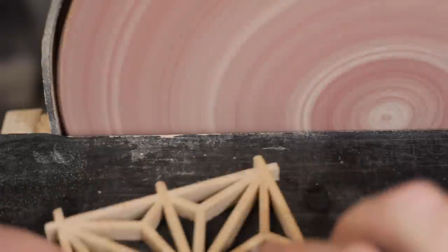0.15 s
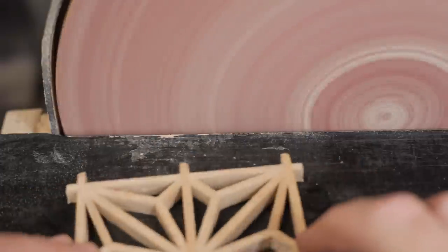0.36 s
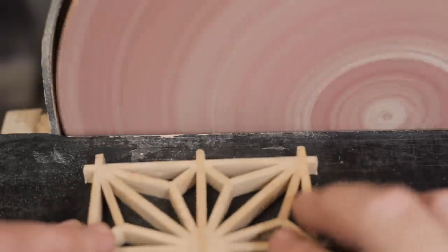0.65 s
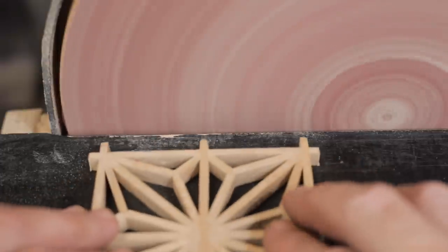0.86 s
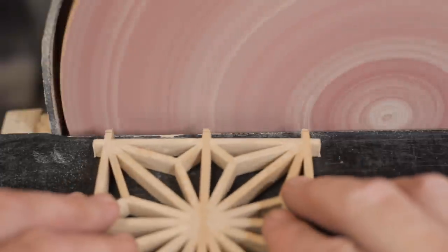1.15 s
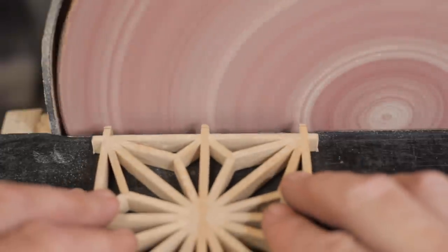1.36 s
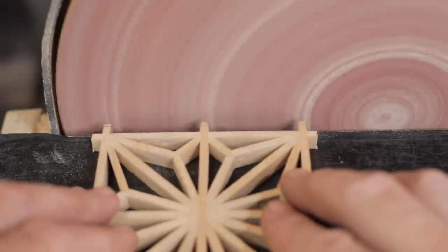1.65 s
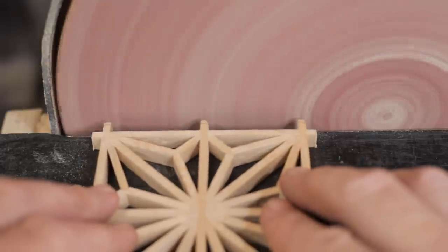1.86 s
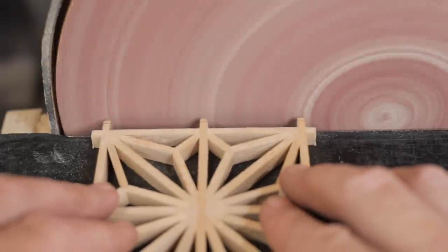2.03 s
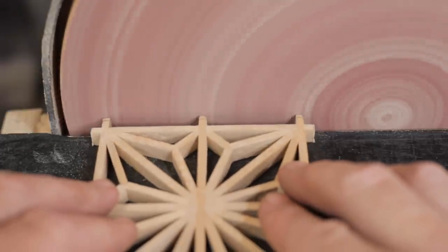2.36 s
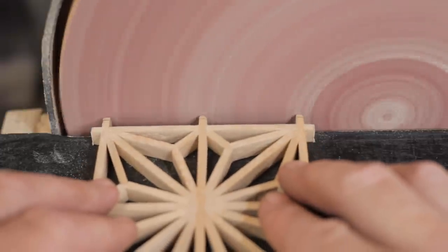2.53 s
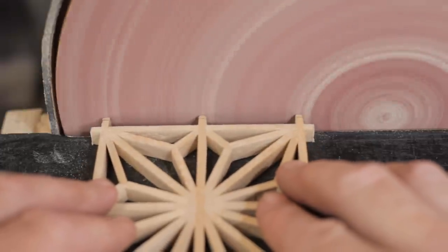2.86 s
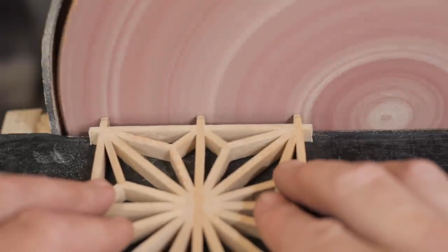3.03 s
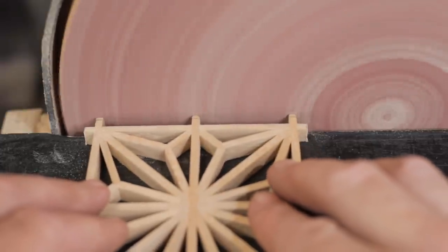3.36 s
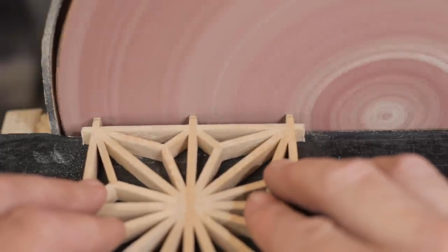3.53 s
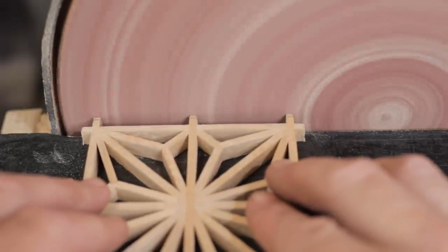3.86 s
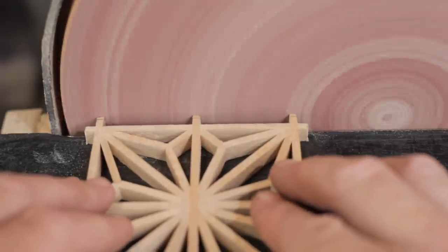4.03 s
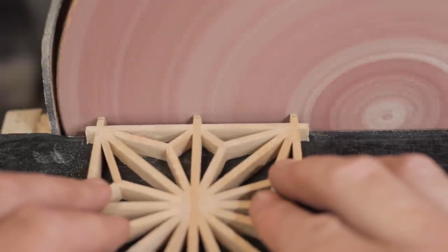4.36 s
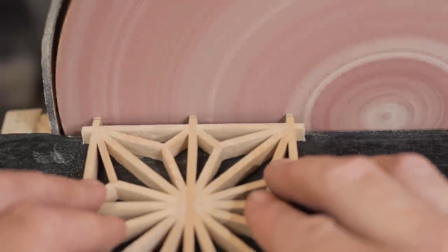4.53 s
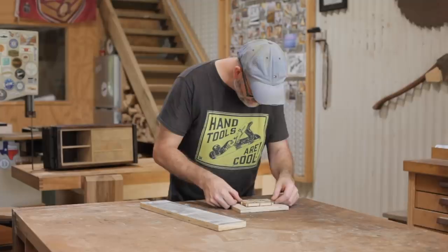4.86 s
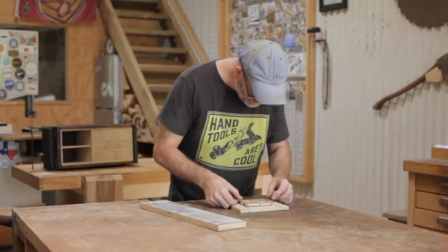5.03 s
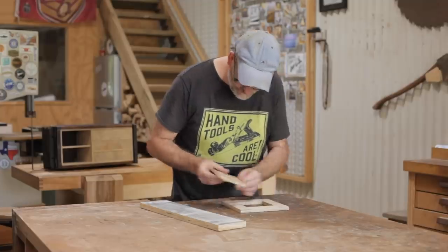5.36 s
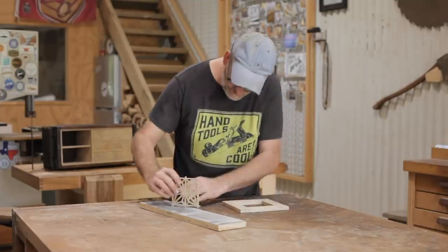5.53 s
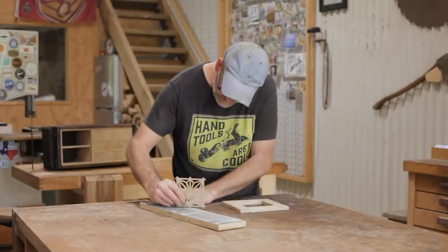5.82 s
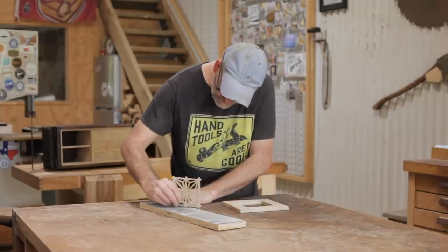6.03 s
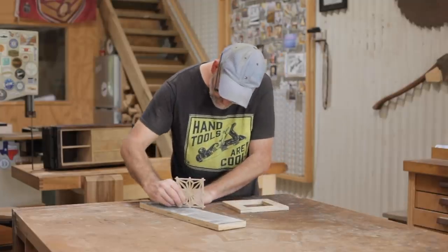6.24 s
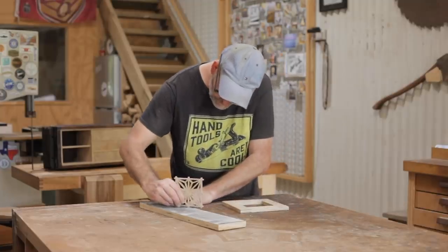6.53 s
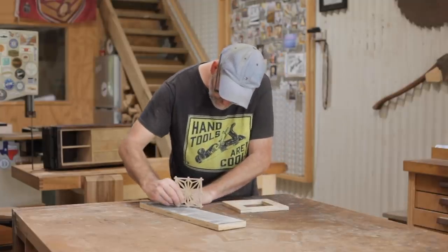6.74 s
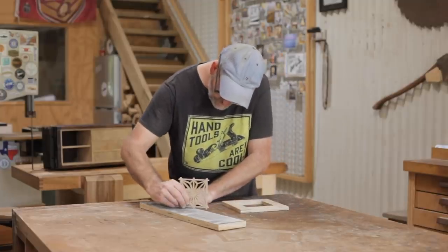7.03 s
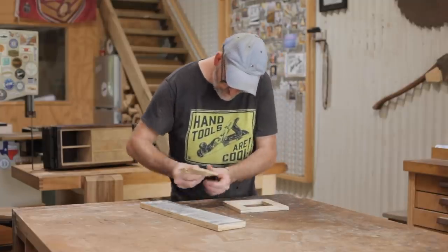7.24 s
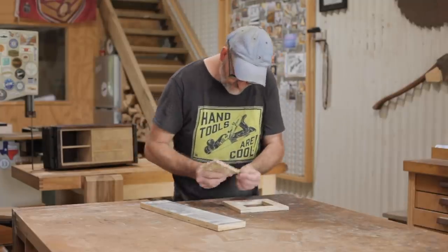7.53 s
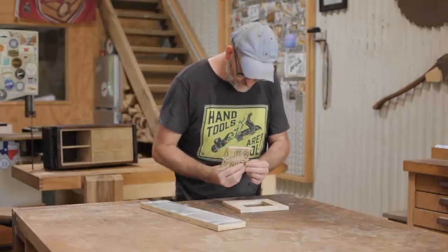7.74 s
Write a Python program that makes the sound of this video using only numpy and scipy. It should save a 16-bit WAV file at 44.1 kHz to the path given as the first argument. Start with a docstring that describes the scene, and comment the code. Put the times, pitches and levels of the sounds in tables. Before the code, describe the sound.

Thin wood rasps and flutters against a humming disc sander, followed by light wooden taps and soft, rapid rubbing on sandpaper.

```python
"""Disc sander, then hand sanding

A disc sander hums in a workshop. A thin wooden lattice is eased against the disc, slapped by its high spot once
a turn and ground with a bright, pulsing hiss. The scene then changes to a quiet room: the lattice is set on a
sanding board, rubbed to and fro by hand, then brushed with the fingers."""
import sys
import numpy as np
from scipy import signal
from scipy.fft import rfft, irfft, next_fast_len
from scipy.io import wavfile
from scipy.ndimage import map_coordinates

SR = 44100
rng = np.random.default_rng(int(sys.argv[2]) if len(sys.argv) > 2 else 0)


def generate_wav(sig):
    """Save sig (samples, or channels by samples) to the path in sys.argv[1] as 16-bit PCM at SR."""
    pcm = np.round(np.clip(np.atleast_2d(sig).T, -1, 1) * 32767).astype(np.int16)
    wavfile.write(sys.argv[1], SR, pcm)


N = 347949

DISC_HZ, FIRST_SLAP_S, CONTACT_S = 13.173, 2.2888, 2.303
FADE_AT_S, FADE_S = 4.965, 0.095
# lattice resonances: centre_hz, width_hz, light_lift_db, seated_lift_db
LATTICE_MODES = [(2010, 140, 3, 6), (2710, 220, 11.5, -2), (3346, 430, 11, 4.5), (3790, 274, 9, 6.5),
                 (4360, 590, 9.5, 3), (5080, 720, 12.5, 3), (5600, 160, 8.5, -3), (5970, 880, 2.5, 6.5),
                 (6620, 530, 9.5, 1), (7040, 270, 4.5, 5), (8100, 640, 5.5, 4.5), (8670, 1300, 6.5, 7.5),
                 (10433, 780, 3.5, 3), (11320, 770, 11, 7), (13400, 1470, 4, 9.5), (15200, 810, 6, 6.5)]


def amp(db):
    """Decibels to gain."""
    return 10 ** (np.asarray(db) / 20)


def unit(x):
    """x at rms 1."""
    return x / np.sqrt(np.mean(x ** 2) + 1e-20)


def clock():
    """Sample times, s."""
    return np.arange(N) / SR


def ramp(start_s, length_s):
    """Linear rise, 0 to 1."""
    return np.clip((clock() - start_s) / length_s, 0, 1)


def wobble(rate_hz):
    """Smooth random curve, rate_hz knots a second."""
    count = int(N * rate_hz / SR) + 4
    steps = np.arange(count * 10) / 10
    return np.interp(clock() * rate_hz, steps, map_coordinates(rng.standard_normal(count), [steps]))


def filtered(x, response):
    """Apply the gain curve response(hz)."""
    size = next_fast_len(N + SR // 4)
    return irfft(rfft(x, size) * response(np.fft.rfftfreq(size, 1 / SR)), size)[:N]


def coloured(x, spectrum, modes=(), low_hz=20):
    """Shape x by (freq_hz, level_db) points, resonances and a low cut; rms 1."""
    hz = np.geomspace(2, SR / 2, 4096)
    points_hz, points_db = np.transpose(spectrum)
    db = np.interp(np.log(hz), np.log(points_hz), points_db)
    for centre_hz, width_hz, lift_db in modes:
        db += lift_db / (1 + (2 * (hz - centre_hz) / width_hz) ** 2)
    gain = amp(db) * hz ** 2 / (hz ** 2 + low_hz ** 2)
    return unit(filtered(x, lambda f: np.interp(f, hz, gain)))


def grit(rate_hz, spread_db):
    """Grain strikes, random in time and size."""
    strikes = (rng.random(N) < rate_hz / SR) * np.sign(rng.standard_normal(N))
    return unit(strikes * amp(spread_db * rng.standard_normal(N)))


def add(track, start_s, sound):
    """Mix sound into track."""
    part = track[round(start_s * SR):][:len(sound)]
    part += sound[:len(part)]


def echoed(x, t60_s, wet_db):
    """x plus diffuse reflections."""
    t = np.arange(SR // 2) / SR
    tail = rng.standard_normal(len(t)) * amp(-60 * t / t60_s) * (t > .001)
    return x + amp(wet_db) * signal.fftconvolve(x, tail / np.linalg.norm(tail))[:N]


def motor(turns, load, hum_hz=99.78):
    """Magnetic hum, disc shake that beats with it under load, and a thin housing whine."""
    # disc vibration: speed_multiple, free_db, loaded_db
    shake_orders = [(3.9, -64.5, -62), (5.06, -64.5, -66), (6.03, -65, -64), (7.01, -62, -43),
                    (8.02, -61, -61), (9.91, -65, -55), (11.3, -71.5, -60.5), (12.22, -68, -57.5),
                    (12.79, -76.5, -55), (17.62, -70, -53), (17.9, -60, -77), (19.17, -76.5, -58),
                    (21.34, -81, -58.5), (22.42, -63.5, -63), (28.9, -74.5, -60.5), (34.9, -62, -72)]
    # housing tones: pitch_hz, rms_db
    whine_tones = [(613.7, -58.5), (748.3, -63), (1279, -60), (1308, -61), (2848, -62)]
    phase = 2 * np.pi * hum_hz * clock()
    hum = amp(-37.5 - 5.4 * load + 0.45 * wobble(7.9)) * np.cos(phase)
    hum += amp(-55 + 1.4 * wobble(6.2)) * np.sin(2 * phase)
    angle = 2 * np.pi * turns + 0.034 * wobble(3.92)
    shake = sum((amp(free_db) * (1 - load) + amp(loaded_db) * load) * np.cos(k * angle)
                for k, free_db, loaded_db in shake_orders)
    shake *= amp(1.3 * wobble(5.6))
    whine = sum(amp(db + 1.3 * wobble(6.04)) * np.sin(2 * np.pi * hz * clock() + 1.2 * wobble(14))
                for hz, db in whine_tones)
    return np.sqrt(2) * (hum + shake + whine)


def rush():
    """Air and bearing noise resonating in the housing."""
    # rush spectrum: freq_hz, level_db
    spectrum = [(135, -21.5), (350, -15.5), (520, -14), (1000, -11.5), (1700, -15.5), (3200, -9),
                (3800, -17.5), (4800, -26.5), (7500, -32), (10500, -43), (15500, -46)]
    # housing and table resonances: centre_hz, width_hz, lift_db
    housing_modes = [(238, 60, 13), (447.3, 8.3, 10.5), (541, 39, 7.5), (612, 40, 11), (684, 23, 8),
                     (746, 18, 11.5), (942, 49, 4), (1082, 27, 7.5), (1302, 60, 10), (1588, 340, 9.5),
                     (1791, 68, 6.5), (2052, 210, 6.5), (2350, 98, 3.5), (2876, 155, 6.5), (5880, 150, 6.5),
                     (7000, 69, 10.5), (8370, 160, 7.5), (12969, 142, 9.5)]
    noise = coloured(rng.standard_normal(N), spectrum, housing_modes, low_hz=60)
    return amp(-37.5 + 0.81 * wobble(60)) * noise


def bearings(turns):
    """Fine rattle and ticking, stronger on one side of each turn."""
    rattle_hz_db = [(2200, -29), (2850, 6), (3300, 16.5), (4000, -36), (8000, -48)]
    ticking_hz_db = [(3000, -22), (6000, 8.5), (9000, 4), (15500, -5)]
    play = np.tanh(wobble(110)) + .3 * np.cos(2 * np.pi * (turns + 0.28))
    rattle = coloured(grit(6500, 1.2), rattle_hz_db, low_hz=2000)
    ticking = coloured(grit(6000, 2), ticking_hz_db, low_hz=2990)
    return amp(-53.5 + 4.3 * play + 1.05 * wobble(12)) * rattle + amp(-68.5 + 10 * play) * ticking


def handling():
    """Ticks and bumps of handled wood: one damped, noisy mode each."""
    # contacts: start_s, level_db, pitch_hz, t60_s
    ticks = [(0.217, -30, 2910, 0.028), (5.165, -58, 3200, .03), (5.2674, -46.5, 2890, 0.038),
             (6.275, -50, 210, .15), (7.631, -53, 432, .15), (7.656, -52, 417, .08),
             (7.718, -47.5, 5600, 0.0073)]
    track, t = np.zeros(N), np.arange(SR // 3) / SR
    for start_s, db, hz, t60_s in ticks:
        tone = np.sin(2 * np.pi * hz * t) + 0.15 * rng.standard_normal(len(t))
        add(track, start_s, amp(db - 60 * t / t60_s) * tone)
    return track


def feed(full_db=-22.5, shortfall_db=7.5, catch_s=0.012, lean_in_s=0.14, seat_s=0.85):
    """Wood catches, leans in and wears flat: grinding level (dB), seating (0-1)."""
    elapsed_s = np.maximum(clock() - CONTACT_S, 0)
    catch_db = 20 * np.log10(ramp(CONTACT_S, catch_s) + 1e-4)
    level_db = full_db - shortfall_db * np.exp(-elapsed_s / lean_in_s) + catch_db
    return level_db, 1 - np.exp(-elapsed_s / seat_s)


def high_spot(turns, seated, half_width_s=0.0045, loose_db=-19.5, seated_db=-24.5):
    """The high spot slaps once a turn: loose wood snaps brightly, seated wood knocks lower."""
    # loose wood rattling: freq_hz, level_db
    snap_spectrum = [(100, -24), (400, -8), (1100, -11), (1900, -5), (2800, -2.5), (4200, -12), (7000, -8),
                     (11000, -4), (15500, -7)]
    knock_hz_db = [(100, -13), (400, -12.5), (1100, -13.5), (2000, -1.5), (3200, -2.5),
                   (5000, -11.5), (9000, -6), (15500, -11.5)]
    offset_s = ((turns + .5) % 1 - .5) / DISC_HZ
    contact = (turns > -.5) * np.exp(-np.abs(offset_s / half_width_s) ** 4)
    slap_db = (1 - seated) * loose_db + seated * seated_db
    slap = contact * amp(slap_db + 0.53 * wobble(19) + 2.4 * np.tanh(wobble(500)))
    grains = grit(14000, 1.5)
    light_modes = [(hz, width, db) for hz, width, db, _ in LATTICE_MODES]
    snap = coloured(grains, snap_spectrum, light_modes, low_hz=89.5)
    knock = coloured(grains, knock_hz_db, low_hz=90)
    return slap * ((1 - seated) * snap + seated * knock)


def bite(turns, seated, hollow_db=-5, proud_lift_db=7, spot_lift_db=6):
    """Depth of cut (dB) over the uneven disc face; seating evens it, a brief firm hold flattens it."""
    def patch(centre_turns, half_turns, order):
        offset_turns = (turns - centre_turns + .5) % 1 - .5
        return np.exp(-np.abs(offset_turns / half_turns) ** order)

    face_db = hollow_db + proud_lift_db * patch(.335, .235, 8) + spot_lift_db * patch(0, .033, 2)
    firm_hold = ramp(3.78, .1) - ramp(4.15, .1)
    return face_db * (1 - 0.38 * seated) * (1 - firm_hold)


def grinding(turns, level_db, seated):
    """Grit tears through wood; the colour shifts as it seats, and the sander's table growls."""
    # grit cutting wood: freq_hz, level_db
    spectrum = [(120, -19), (280, -16.5), (600, -22.5), (1100, -34.5), (1800, -17.5), (3000, -12.5),
                (4500, -13.5), (7500, -11.5), (10000, -7.5), (12300, -10.5), (15500, -13.5)]
    growl_hz_db = [(150, -20), (280, -5.5), (400, -6.5), (600, -30.5)]
    table_modes = [(291, 31, 12), (391, 26, 9.9)]  # centre_hz, width_hz, lift_db
    bite_db = bite(turns, seated)
    grains = grit(16000, 3) * amp(1.5 * np.tanh(wobble(450)) + 0.7 * wobble(90))
    light = coloured(grains, spectrum, [(hz, width, db) for hz, width, db, _ in LATTICE_MODES], 70)
    firm = coloured(grains, spectrum, [(hz, width, db) for hz, width, _, db in LATTICE_MODES], 70)
    cut = (1 - seated) * light + seated * firm
    # fizz grows faster with the bite than the rasp below it
    rasp = filtered(cut, lambda hz: 1 / (1 + (hz / 7500) ** 10))
    fizz = (cut - rasp) * amp(bite_db + .5 * (level_db + 22))
    growl = amp(-26.5) * coloured(rng.standard_normal(N), growl_hz_db, table_modes, low_hz=100)
    return amp(level_db) * (rasp * amp(0.17 * bite_db) + fizz + growl)


def room_tone(drone_hz=134, sink_hz_per_s=7):
    """Air and a fuzzy, sinking drone, both swelling late, over rumble and faint hiss."""
    # room air: freq_hz, level_db
    air_spectrum = [(30, -24), (55, -15), (110, -2.5), (150, -4), (230, -8), (330, -14.5), (600, -19),
                    (950, -20.5), (1600, -19.5), (3000, -22.5), (6500, -25.5), (9000, -31.5), (15500, -49)]
    rumble_hz_db = [(15, 4), (45, -8), (90, -16), (300, -60)]
    swell = ramp(6.85, .65)
    air = amp(-63.5 + 5 * swell + 0.76 * wobble(10)) * coloured(rng.standard_normal(N), air_spectrum)
    pitch_hz = drone_hz - sink_hz_per_s * (clock() - FADE_AT_S)
    phase = 2 * np.pi * np.cumsum(pitch_hz) / SR
    drone = unit((1 + 0.33 * wobble(22)) * np.sin(phase) + 0.26 * wobble(22) * np.cos(phase))
    rumble = amp(-84) * coloured(rng.standard_normal(N), rumble_hz_db, low_hz=8)
    hiss = amp(-66.5) * rng.standard_normal(N)
    return air + amp(-68 + 7 * swell) * drone + rumble + hiss


def board_knocks(crack_t60_s=0.015):
    """The lattice knocks on the board: a short crack and damped modes."""
    # knocks: start_s, relative_db
    taps = [(5.5767, -30), (6.1694, -37), (6.2731, -37.5)]
    # ringing wood: pitch_hz, relative_db, t60_s
    modes = [(214, -18, .15), (450, -8, 0.16), (515, -11, 0.075), (740, -7, 0.051), (840, -10, .04),
             (1125, -11, 0.048), (1240, -4.5, 0.032), (1560, -7, .02), (1980, -4, 0.02), (2980, -8, .012),
             (3800, -5, .011), (5440, 1, 0.011)]
    clack_hz_db = [(300, -11), (1200, 6), (4500, 0), (9000, -11), (15500, -34)]
    track, t = np.zeros(N), np.arange(SR // 3) / SR
    clack = coloured(rng.standard_normal(N), clack_hz_db, low_hz=200)
    for start_s, tap_db in taps:
        ring = sum(amp(db + rng.normal(0, 1.5) - 60 * t / t60_s)
                   * np.sin(2 * np.pi * (hz * t + rng.random())) for hz, db, t60_s in modes)
        crack = 1.3 * amp(-60 * t / crack_t60_s) * clack[round(start_s * SR):][:len(t)]
        add(track, start_s, amp(tap_db - 11.5) * (ring + crack))
    return track


def hand_sanding(first_beat_s=5.838, beat_s=0.0923, stroke_count=15, head_start_s=0.068, overlap=1.145):
    """Wood scrapes over grit; each stroke swells and sinks with hand speed."""
    # scrape spectrum: freq_hz, level_db
    spectrum = [(200, -14), (350, -10), (700, -13), (1100, -12), (2600, -13.5), (4200, -18), (7500, -18.5),
                (11000, -18), (15500, -18)]
    # wood and board resonances: centre_hz, width_hz, lift_db
    board_modes = [(457, 55, 13.7), (570, 20, 5.2), (946, 40, 5.1), (1310, 62, 6.8), (1650, 470, 9.5),
                   (3470, 207, 3.3), (5700, 2400, 16.9), (9527, 441, 5.6), (12150, 1080, 5.2)]
    # hand pressure: time_s, level_db
    pressure = [(5.77, -61.5), (5.9, -54), (6.015, -48), (6.118, -53), (6.211, -50.5), (6.48, -53),
                (7.04, -50), (7.128, -47.5)]
    k = np.arange(stroke_count)
    slowness = np.maximum(1 - k / 3, 0) ** 2  # up to speed after three strokes
    middles_s = first_beat_s + k * beat_s - head_start_s * slowness
    lengths_s = overlap * np.gradient(middles_s)
    gains = amp(np.interp(middles_s, *np.transpose(pressure)))
    strokes = sum(gain * np.cos(np.pi * np.clip((clock() - middle_s) / length_s, -.5, .5)) ** 1.6
                  for middle_s, length_s, gain in zip(middles_s, lengths_s, gains))
    scrape = coloured(grit(9000, 2.9), spectrum, board_modes, low_hz=200)
    return strokes * amp(0.68 * wobble(200)) * scrape


def finger_brush(start_s=7.568, level_db=-50.5, attack_s=0.004, hold_s=0.028, fall_db_per_s=250):
    """Fingers brush dust off the lattice."""
    # brush spectrum: freq_hz, level_db
    spectrum = [(180, -28), (300, -8), (532, -23), (750, -4), (884, -26), (975, -20), (1970, -10),
                (2320, -20.5), (2970, -11.5), (4850, -10.5), (15000, -30)]
    fall_db = fall_db_per_s * np.maximum(clock() - start_s - hold_s, 0)
    envelope = ramp(start_s, attack_s) * amp(level_db - fall_db + 1.2 * wobble(250))
    return envelope * coloured(grit(6000, 3.8), spectrum)


def scene():
    """The sander gives way to the quiet bench."""
    turns = (clock() - FIRST_SLAP_S) * DISC_HZ
    grind_db, seated = feed()
    load = np.clip(amp(grind_db + 20), 0, 1)
    machine = motor(turns, load) + rush() + bearings(turns)
    wood = high_spot(turns, seated) + grinding(turns, grind_db, seated)
    sander = machine + echoed(wood, t60_s=0.019, wet_db=-15.5)  # reflections off disc and table
    knocks = echoed(handling() + board_knocks(), t60_s=0.35, wet_db=-7.5)
    rubbing = echoed(hand_sanding() + finger_brush(), t60_s=0.25, wet_db=-14)
    fade = (1 - ramp(FADE_AT_S, FADE_S)) ** 1.27
    return (fade * sander + knocks + rubbing + (1 - fade) * room_tone())[None]


def record(dry):
    """Steep low-pass."""
    top_hz, edge_hz = 15900, 300
    return filtered(dry[0], lambda hz: np.clip((top_hz - hz) / edge_hz + .5, 0, 1) ** 2)[None]


dry = scene()
out = record(dry)
generate_wav(out)
```